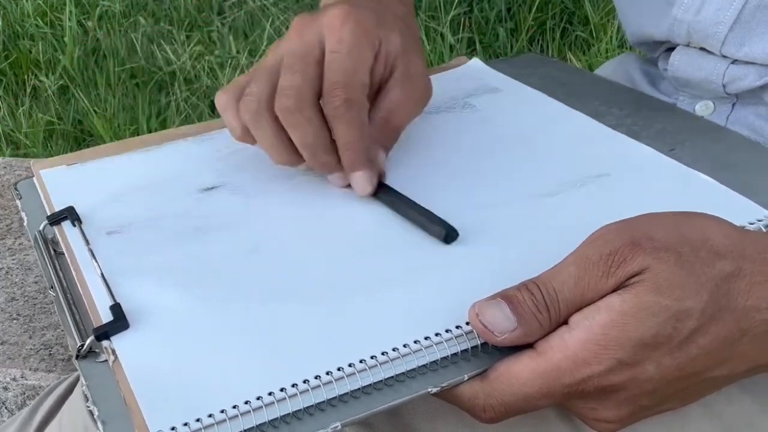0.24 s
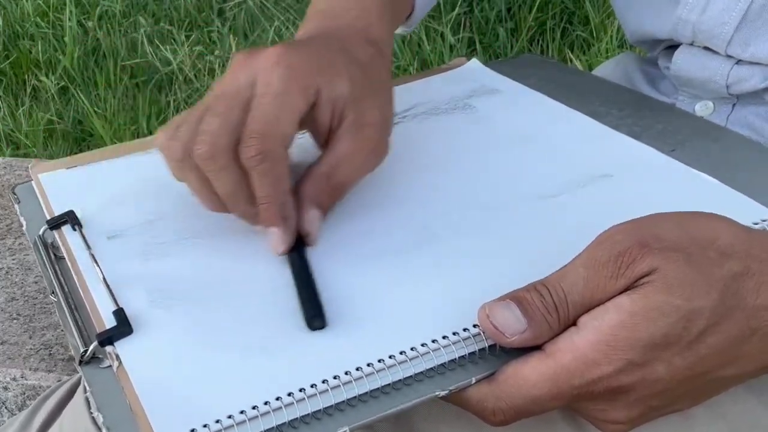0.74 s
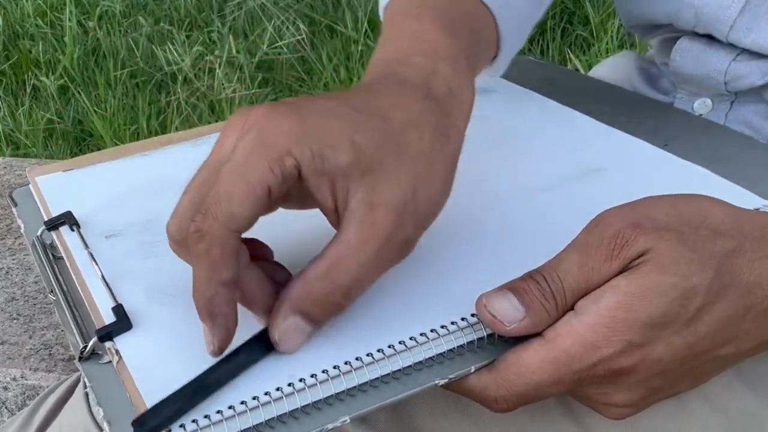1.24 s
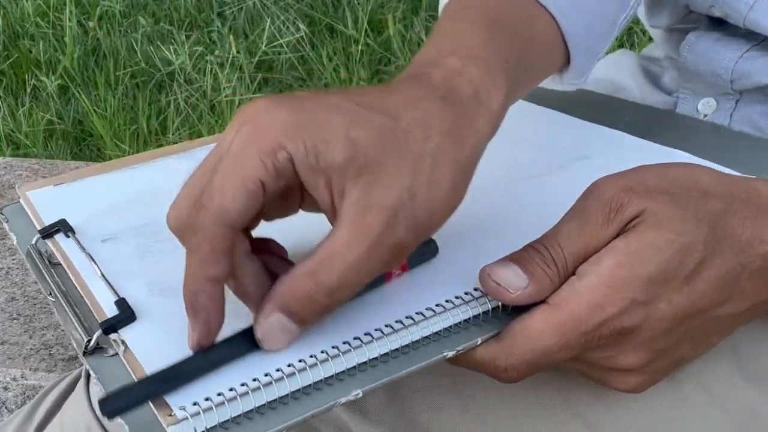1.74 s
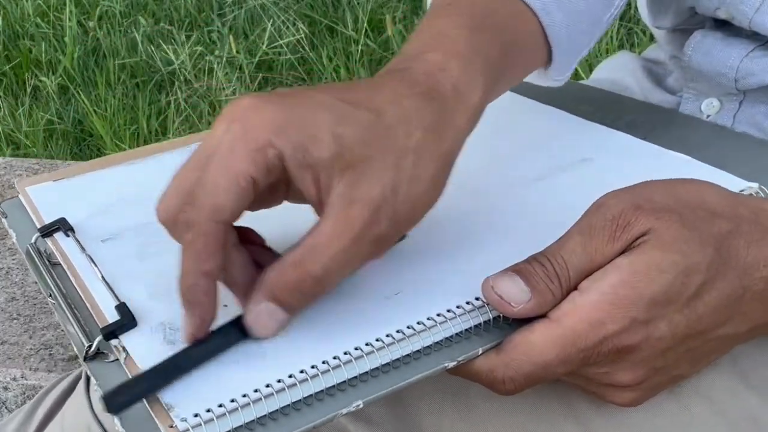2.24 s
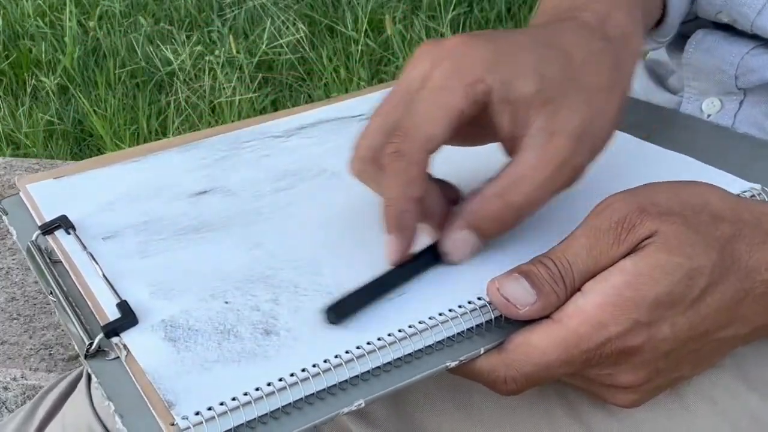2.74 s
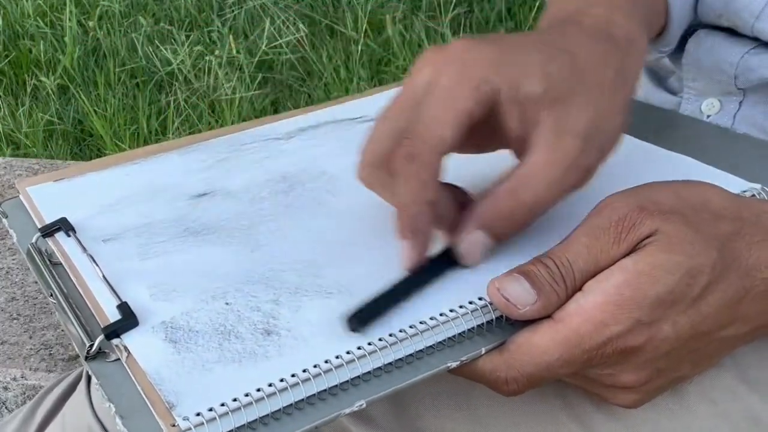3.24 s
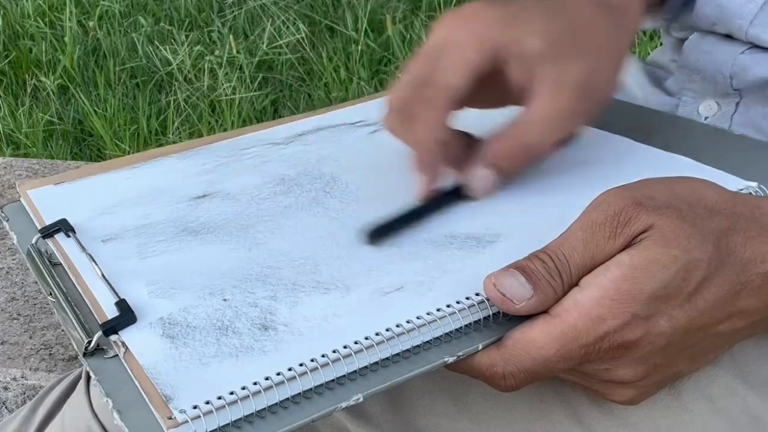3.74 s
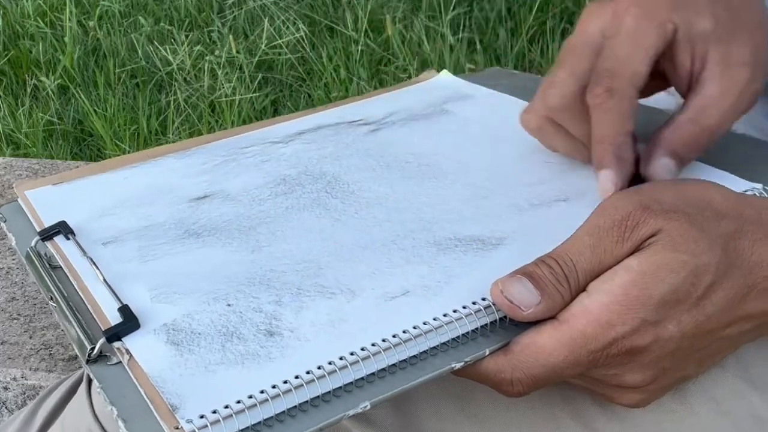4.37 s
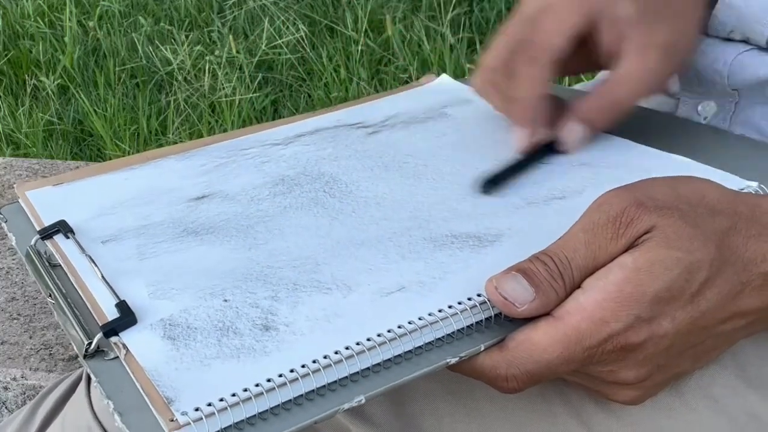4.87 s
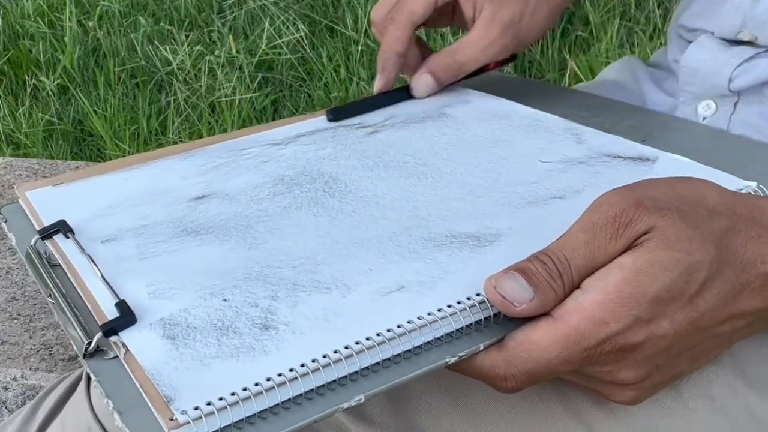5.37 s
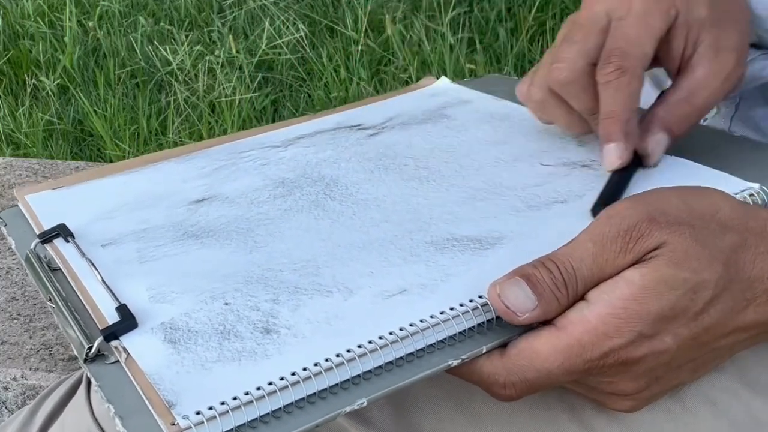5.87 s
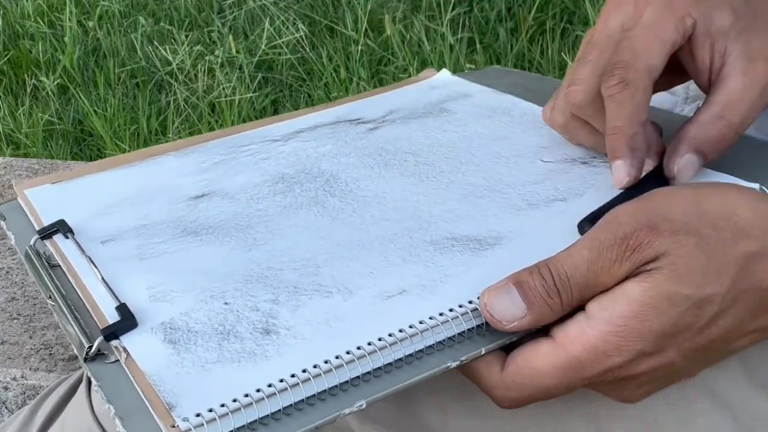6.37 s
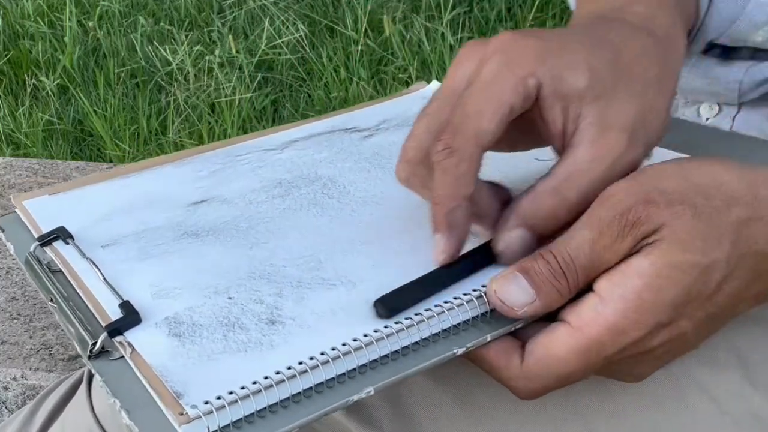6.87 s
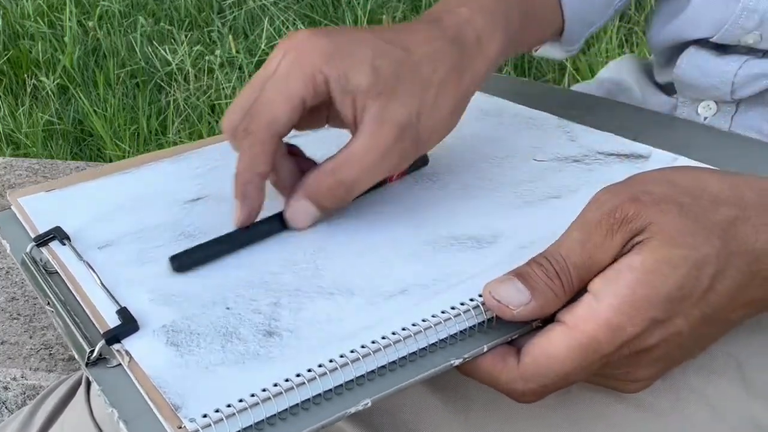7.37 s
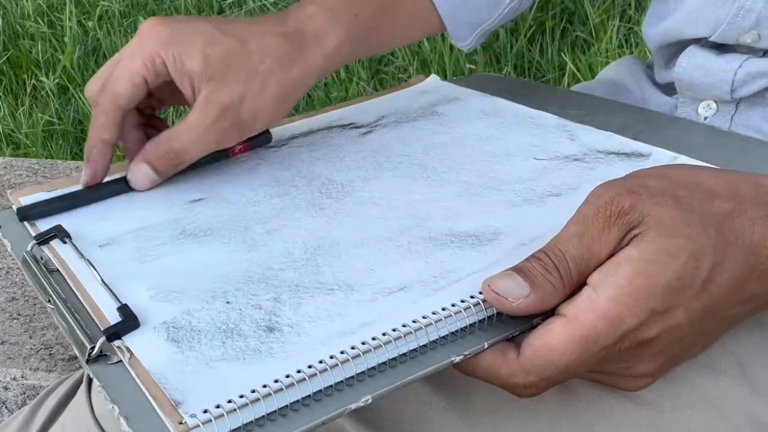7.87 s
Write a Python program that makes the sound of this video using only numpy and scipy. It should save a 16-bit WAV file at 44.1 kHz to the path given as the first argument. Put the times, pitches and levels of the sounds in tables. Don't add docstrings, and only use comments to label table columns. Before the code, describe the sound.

Close, grainy charcoal strokes sweep back and forth over a sketch sheet, with a few hollow board taps, wind thumps and faint traffic hum.

```python
import sys
import numpy as np
from scipy import signal
from scipy.fft import rfft, irfft, next_fast_len
from scipy.io import wavfile
from scipy.ndimage import uniform_filter1d, map_coordinates

SR = 44100
rng = np.random.default_rng(int(sys.argv[2]) if len(sys.argv) > 2 else 0)


def to_wav(sig):
    pcm = np.clip(np.atleast_2d(sig), -1, 1) * 32767
    pcm = np.round(pcm).astype(np.int16)
    wavfile.write(sys.argv[1], SR, pcm.T)


def gain_from_db(level_db):
    decades = np.asarray(level_db, float) / 20
    return 10 ** decades


N = 357634
LEFT_RIGHT = np.array([[0.5], [-0.5]])

# (time [s], lead of the left port [microseconds])
PLACE = [(0.0, 141), (0.26, 23), (0.45, 127), (0.66, 127), (0.85, 84), (2.25, 128), (2.48, 10), (2.78, 14),
         (2.92, 99.5), (3.1, 90), (3.3, 13), (4.9, -20), (5.5, 6), (6.1, -83), (6.9, -9), (7.25, 120),
         (7.5, 68), (7.8, 129)]


def unit(x):
    return x / np.sqrt(np.mean(x ** 2) + 1e-20)


def colour(points, hz):
    f, v = np.transpose(points)
    return gain_from_db(np.interp(np.log(hz + 1), np.log(f + 1), v, left=-120, right=-120))


def along(points, hz):
    f, v = np.transpose(points)
    return np.interp(np.log(hz + 1), np.log(f + 1), v)


def curves(rows):
    s, *cols = np.transpose(rows)
    return [np.interp(np.arange(N) / SR, s, c) for c in cols]


def wobble(rate):
    knots = rng.standard_normal(int(N * rate / SR) + 4)
    return np.interp(np.arange(N) * rate / SR, np.arange(len(knots)), knots)


def filtered(x, response):
    m = next_fast_len(N + 8192)
    return irfft(rfft(x, m) * response(np.fft.rfftfreq(m, 1 / SR)), m)[..., :N]


def patchy(x, patchy_db):
    z = signal.stft(x, nperseg=512)[2]
    patches = rng.standard_normal(z.shape[-2:])
    patches = uniform_filter1d(patches, size=9, axis=0)
    patches = uniform_filter1d(patches, size=14, axis=1)
    return signal.istft(z * gain_from_db(patchy_db * unit(patches)), nperseg=512)[1][..., :N]


def treble_ports(x):
    # (frequency [Hz], level [dB])
    loose = [(5500, 6), (7500, 0), (8600, -14.5), (15000, -14)]
    late = lambda hz: np.exp(-2j * np.pi * np.maximum(hz, 7000) * 164e-6 * LEFT_RIGHT)
    return filtered(x[0], late) + filtered(x[1:], lambda hz: gain_from_db(along(loose, hz)))


def moving_ports(x, lead_us, loose_db):
    shift = lead_us * 1e-6 * SR / 2
    pair = [map_coordinates(x[0], [np.arange(N) + way * shift], order=3) for way in (1, -1)]
    return np.array(pair) + gain_from_db(loose_db) * x[1:]


def diffuse(spectrum, alike, lag=0.):
    turn = lambda hz: np.arccos(np.clip(along(alike, hz), -1, 1)) / 2
    noise = rng.standard_normal((2, N))
    mid, side = filtered(noise, lambda hz: colour(spectrum, hz) * [np.cos(turn(hz)), np.sin(turn(hz))])
    trail = np.exp(-1j * lag * LEFT_RIGHT)
    return unit(filtered(np.array([mid + side, mid - side]), lambda hz: trail + 0 * hz))


def field():
    # (frequency [Hz], level [dB per Hz])
    traffic_colour = [(35, -25), (60, 4), (150, -3.5), (250, -1), (350, -5.5), (500, -7), (800, -6.5),
                      (1100, -13.5), (1600, -18.5), (2200, -27.5), (3200, -60)]
    # (frequency [Hz], likeness [-1 to 1])
    traffic_alike = [(60, 0.58), (290, 0.65), (600, -0.37), (1000, -0.26), (1500, -0.18)]
    # (time [s], level [dB])
    traffic_level = [(0.0, -63.5), (1.47, -61.5), (2.73, -65), (3.25, -63), (4.81, -63), (6.44, -62.5),
                     (7.07, -65), (8.11, -62)]
    # (frequency [Hz], level [dB per Hz])
    insect_colour = [(1800, -13.5), (3000, -18), (5100, -14.5), (5600, -12), (6500, 1.5), (7200, 1.5),
                     (8200, -10.5), (9200, 3), (10200, 2.5), (11300, -14), (15700, -15)]
    # (time [s], level [dB])
    insect_level = [(0.0, -61.5), (2.6, -60), (4.5, -60), (6.2, -61), (8.11, -61)]
    hum_gain = gain_from_db(curves(traffic_level)[0] + 8.0 + 0.16 * wobble(3.9))
    hum = hum_gain * patchy(diffuse(traffic_colour, traffic_alike), patchy_db=1.5)
    hiss = unit(filtered(rng.standard_normal((3, N)), lambda hz: colour(insect_colour, hz)))
    return hum + gain_from_db(curves(insect_level)[0] + 0.4 * wobble(2.82)) * treble_ports(hiss)


def puffs():
    # (time [s], peak [dB], final pitch [Hz], left minus right [dB], length [s])
    eddies = [(0.084, -28.5, 108, -4.5, 0.016), (0.446, -43, 68, -3, 0.05), (0.516, -39, 77, -3, 0.031),
              (0.718, -41, 69.6, -1, 0.033), (1.095, -44, 90.4, 5, 0.05), (3.226, -38, 68, -2.5, 0.017),
              (4.068, -36, 61.6, 3, 0.041), (5.345, -36, 40.8, 0, 0.076), (5.492, -29.5, 58.6, 2, 0.073),
              (5.986, -31.5, 96.9, 0.5, 0.081), (6.016, -33.5, 108, -1, 0.043),
              (7.307, -37.5, 71, -3, 0.027), (7.479, -44, 72.7, 1, 0.07)]
    sweep_s = 0.011
    out, t = np.zeros((2, N + SR)), np.arange(SR // 4) / SR
    for s, db, hz, pan_db, length in eddies:
        fall = hz * (t + sweep_s * (1 - np.exp(-t / 0.011)))
        turn = 2 * np.pi * fall + np.array([[0], [1.6]]) + rng.uniform(0, 1)
        swing = np.sin(turn) + 0.4 * np.exp(-t / 0.016) * np.sin(2.6 * turn)
        shape = (1 - np.exp(-(t / 0.0069) ** 2)) * np.exp(-(t / length) ** 2)
        out[:, round(s * SR):][:, :len(t)] += gain_from_db(db + 1.5 + pan_db * LEFT_RIGHT) * shape * swing
    return out[:, :N]


def wind():
    # (time [s], strength [dB])
    strength = [(0.0, -51), (0.4, -63), (0.65, -55), (0.95, -59), (1.2, -51.5), (1.35, -69), (1.87, -64),
                (2.2, -73), (2.7, -69), (2.85, -62), (3.7, -51), (4.6, -48.5), (5.9, -50.5), (6.28, -43),
                (6.4, -63.5), (7.2, -59), (7.5, -56), (8.11, -49)]
    # (time [s], level [dB], half length [s], flutter against the level [dB])
    short_gusts = [(0.097, -45.5, 0.018, 2), (0.233, -45, 0.043, -22), (0.347, -47, .03, -22),
                   (0.462, -45.5, .02, -16), (0.547, -42.5, 0.025, -3.5), (0.733, -40.5, 0.023, -4.5),
                   (0.799, -43, 0.016, -20), (1.123, -61, 0.035, -12), (2.875, -59, 0.068, -3),
                   (2.97, -59, 0.029, -20), (3.464, -52, 0.059, -7), (3.253, -58, 0.036, -5),
                   (3.816, -46.5, 0.048, -14), (3.891, -43, 0.036, -20), (4.09, -48, 0.036, -14),
                   (4.245, -52, 0.035, -6), (4.504, -54, .04, -10), (4.702, -47, .025, -14),
                   (4.965, -52, 0.041, -8), (5.124, -45, 0.019, -12), (5.2, -52, .03, -12),
                   (5.374, -45.5, 0.039, -8), (5.52, -39.5, .045, -24), (5.836, -49, 0.065, -13),
                   (6.013, -41, 0.048, -15), (6.16, -49, 0.02, -12), (7.002, -66.5, .15, 10.5),
                   (7.435, -49, .02, -21), (7.589, -47, 0.015, -17), (8.007, -52.5, 0.022, -10)]
    # (frequency [Hz], level [dB per Hz])
    buffet_colour = [(20, -41), (32, -8.5), (50, -5), (60, -0.5), (95, -3.5), (125, -17), (170, -45)]
    # (frequency [Hz], level [dB per Hz])
    flutter_colour = [(70, -31), (110, 2.5), (150, -3.5), (250, -11), (400, -19.5), (600, -39)]
    flutter_per_db, flutter_db = 0.85, -4
    steady, t = gain_from_db(curves(strength)[0]), np.arange(N) / SR
    gusts, ragged = sum(gain_from_db([[db], [db + share_db]]) * np.exp(-((t - s) / half) ** 2)
                        for s, db, half, share_db in short_gusts)
    ripple = gain_from_db(flutter_db - 58) * (steady / gain_from_db(-58)) ** flutter_per_db + ragged
    lumps = gain_from_db(2.1 * np.array([wobble(15), wobble(7.5)]))
    buffet = unit(lumps * diffuse(buffet_colour, [(60, 0.35)], lag=1.54))
    flutter = unit(lumps * diffuse(flutter_colour, [(150, 0.35)], lag=1.13))
    return gain_from_db(0.5) * (steady + gusts) * buffet + ripple * flutter + puffs()


def groans():
    # (time [s], level [dB], pitch [Hz], length [s])
    flank_rubs = [
        (1.97, -69.5, 1510, 0.12),
        (5.727, -68, 1570, .06),
        (6.8, -67, 1520, 0.11),
    ]
    t, out = np.arange(N) / SR, 0
    for s, db, centre_hz, length in flank_rubs:
        ring = filtered(rng.standard_normal((2, N)), lambda hz: np.exp(-((hz - centre_hz) / 210) ** 2))
        out = out + gain_from_db(db) * np.exp(-((t - s) / length) ** 2) * unit(ring + 0.8 * ring[::-1])
    return out


def taps():
    # (time [s], peak [dB], pitch [Hz], left minus right [dB], snap [dB])
    knocks = [
        (5.87, -39.5, 1007, -2.0, -14),
        (5.881, -46, 1070, 0, -34),
        (6.15, -39, 1050, 0, -26),
        (6.206, -45, 740, -1.0, -18),
        (6.336, -48, 630, 1.5, -25),
        (6.384, -37, 817, -1, -34),
        (6.598, -43.5, 774, -2, -32),
        (6.66, -46.5, 1590, 6, -7),
        (7.268, -36.5, 1245, 8, -5),
    ]
    tap_cycles = 15.1
    out, t = np.zeros((2, N + SR)), np.arange(SR // 10) / SR
    lead_us = curves(PLACE)[0]
    hollow = signal.butter(2, [450, 1700], "bandpass", fs=SR, output="sos")
    for s, db, hz, pan_db, snap_db in knocks:
        port_delay = np.array([[0], [1e-6 * lead_us[round(s * SR)]]])
        late = np.clip(t - port_delay - 9e-4, 0, 1)
        fall = hz * (late + 0.00096 * (1 - np.exp(-late / 0.0005)))
        knock = np.sin(2 * np.pi * fall)
        knock = knock + 0.5 * np.sin(2 * np.pi * 1.63 * fall) + 0.36 * np.sin(2 * np.pi * 0.57 * fall)
        knock = knock * gain_from_db(-60 * late * hz / tap_cycles) * (1 - np.exp(-late / 0.00076))
        edge = late - .0015
        snap = sum(np.cos(2 * np.pi * edge_hz * edge) for edge_hz in (2600, 3700, 5500))
        snap = -gain_from_db(snap_db - 4) * snap * np.exp(-(edge / 0.0006) ** 2)
        murmur = unit(signal.sosfilt(hollow, rng.standard_normal((2, len(t)))))
        after = gain_from_db(-15.0 - 60 * t / 0.066) * murmur
        out[:, round(s * SR):][:, :len(t)] += gain_from_db(db + 6 + pan_db * LEFT_RIGHT) * (knock + snap + after)
    return out[:, :N]


def hand():
    # (turn [s], scratch left at the turn [dB], top scratch [dB], place of the top in the stroke [0-1])
    strokes = [(-0.02, -60, -52, 0.6), (0.254, -60, -51.5, 0.3), (0.564, -71, -52.5, 0.64),
               (0.813, -83, -53.5, 0.46), (1.028, -70, -50.5, 0.37), (1.327, -81, -53.5, 0.37),
               (1.571, -74, -53.5, 0.63), (1.826, -69, -52.5, 0.51), (2.09, -72.5, -54.5, 0.57),
               (2.27, -55.5, -52, 0.3), (2.629, -73, -52, 0.72), (3.033, -72, -48.5, 0.49),
               (3.298, -63, -50.5, 0.24), (3.588, -69.5, -48, 0.48), (3.851, -67, -50.5, 0.43),
               (4.136, -77, -50.5, 0.33), (4.405, -65, -51, 0.68), (4.719, -79, -50, 0.39),
               (5.003, -72, -58, 0.5), (5.1, -60, -52.5, 0.5), (5.368, -60.5, -49.5, .4),
               (6.18, -58, -52.5, 0.2), (6.33, -56, -56, 1), (7.388, -57, -52.5, 0.43),
               (7.772, -61.5, -55, 0.78), (7.982, -91, -57, 0.15), (8.2, -65, -65, .5)]
    # (time [s], level [dB])
    contact = [
        (5.36, -0.5),
        (5.52, -3),
        (5.69, 1),
        (5.85, -10),
        (6.15, -14),
        (6.4, -9.5),
        (6.85, -0.5),
        (7.2, 1),
    ]
    roundness = 0.62
    dwell_s = 0.0062
    s, turn_db, top_db, crest = np.transpose(strokes)
    place = np.interp(np.arange(N) / SR, s, np.arange(len(s)))
    k = place.astype(int)
    done, crest = place - k, np.clip(crest[k], .05, .95)
    pause = 2 * dwell_s / np.diff(s, append=s[-1] + 1)[k]
    rise = np.minimum(done / crest, (1 - done) / (1 - crest))
    rise = np.clip(rise * (1 + pause) - pause, 0, 1)
    arch = np.sin(np.pi / 2 * rise) ** roundness
    rest = gain_from_db(np.interp(place, np.arange(len(s)), turn_db))
    return gain_from_db(curves(contact)[0]) * (rest + (gain_from_db(top_db[k]) - rest) * arch), done


def grit(spread_db):
    return unit(rng.standard_normal(N) * gain_from_db(spread_db * rng.exponential(size=N)))


def charcoal():
    # (frequency [Hz], level [dB per Hz])
    board_colour = [(1100, -30), (1500, -3.5), (2150, -2), (2700, 2.5), (3600, 5), (5000, 3), (5700, 4),
                    (6500, -24), (7600, -1), (8400, -22)]
    # (frequency [Hz], level [dB per Hz])
    tooth_colour = [(4900, -45), (5500, -12.5), (6500, -8), (8000, -3), (9200, 2.5), (10400, 5), (11000, 2),
                    (11700, -10), (12600, -32)]
    # (frequency [Hz], level [dB per Hz])
    gloss_colour = [(10800, -30), (11800, -1), (13000, -.5), (14500, 0), (15700, -.5), (16200, -1)]
    # (frequency [Hz], left minus right [dB])
    sides = [(3000, 0), (4500, 8), (5600, 6), (6500, -0.5), (7500, -2.5), (8600, -0.5)]
    # (time [s], weight on the board [dB], flatness of the stick [dB])
    grip = [(0.0, -12, -1), (0.3, -6.5, -3), (0.55, -10.5, 1.5), (0.85, -6.5, 0), (1.2, -9, -1),
            (1.75, -5, 3), (2.05, -10, -1), (2.4, -5, 2), (2.9, -8, 1), (3.4, -7.5, -0.5),
            (3.65, -7.5, -0.5), (4.3, -9.5, -1.5), (5.0, -9.5, -2), (5.6, -8.5, -2.5), (6.3, -10, -1),
            (7.0, -8, -1.5), (7.5, -9, -1.5), (8.11, -10, -2.5)]
    gloss_per_db, gloss_rise_db = 0.26, 1
    board_knee = 0.66
    speed, done = hand()
    (lead_us,), (board_db, flat_db) = curves(PLACE), curves(grip)
    effort = speed / gain_from_db(-52)
    gloss = effort ** gloss_per_db * gain_from_db(flat_db + gloss_rise_db * done)
    catches = patchy(np.array([grit(spread_db=1.78) for _ in range(3)]), patchy_db=1.93)
    drag = speed * gain_from_db(1.18 * wobble(25))
    layer = lambda points: unit(filtered(catches, lambda hz: colour(points, hz)))
    high = drag * (gain_from_db(6.5) * layer(tooth_colour) + gain_from_db(1.9) * gloss * layer(gloss_colour))
    low = drag * 1.596 / (effort + board_knee) * gain_from_db(board_db + 2.5) * layer(board_colour)
    both = treble_ports(high) + moving_ports(low, lead_us, loose_db=-3.5)
    return filtered(both, lambda hz: gain_from_db(along(sides, hz) * LEFT_RIGHT))


def scene():
    return field() + wind() + groans() + taps() + charcoal()


def top_cut(x):
    return signal.sosfilt(signal.butter(12, 15700, fs=SR, output="sos"), x)


def record(dry):
    top_hz = 15740
    return top_cut(filtered(dry, lambda hz: hz < top_hz))


dry = scene()
out = record(dry)
to_wav(out)
```